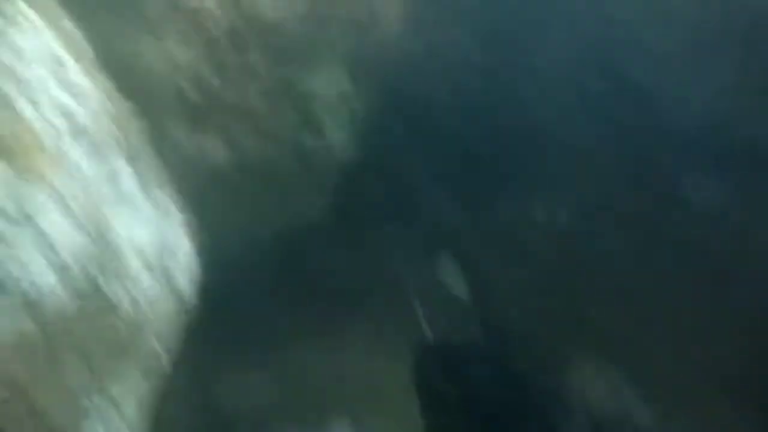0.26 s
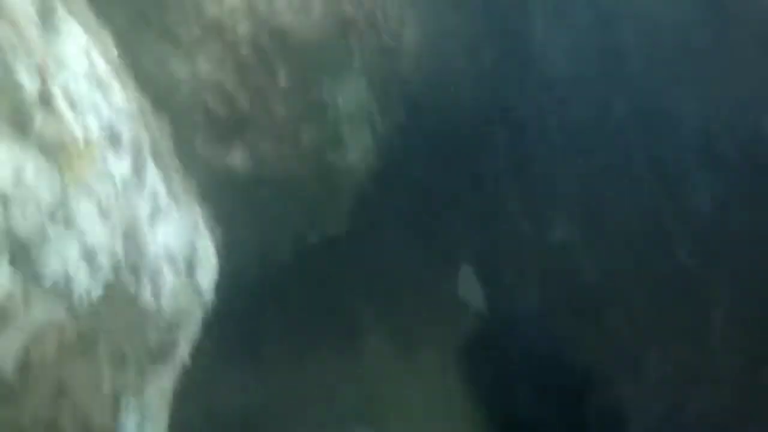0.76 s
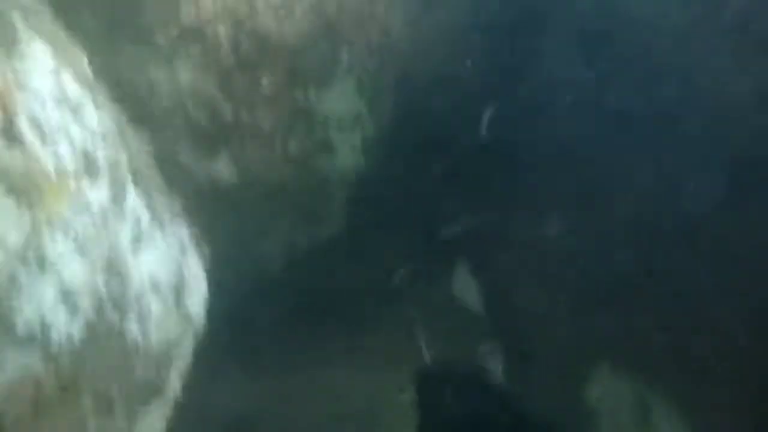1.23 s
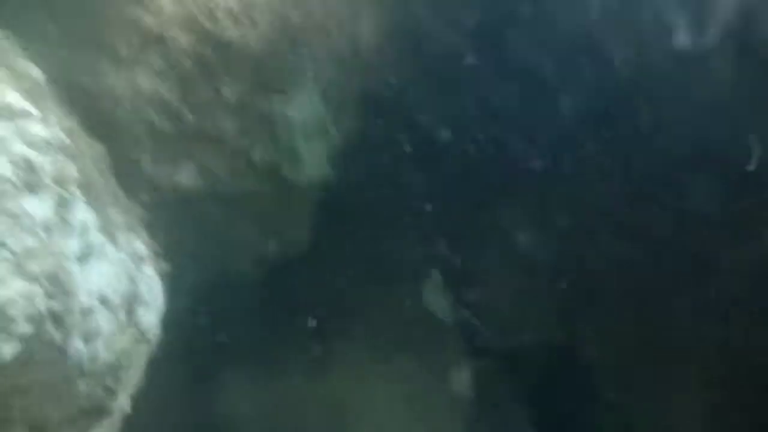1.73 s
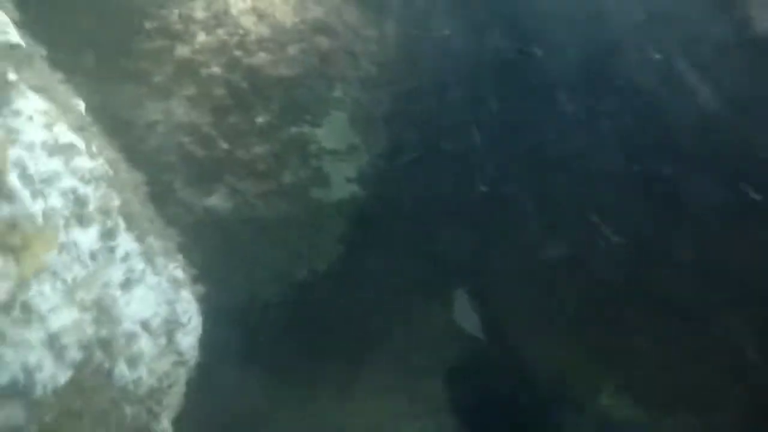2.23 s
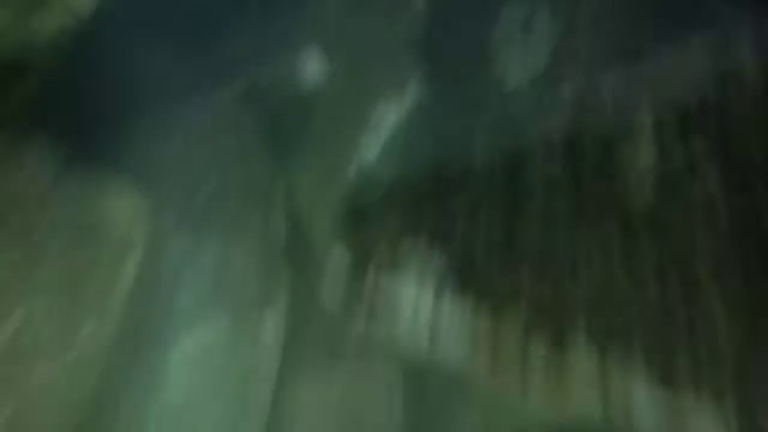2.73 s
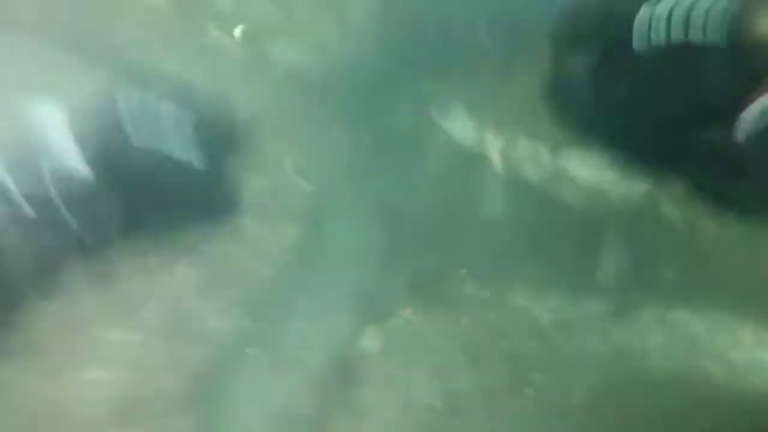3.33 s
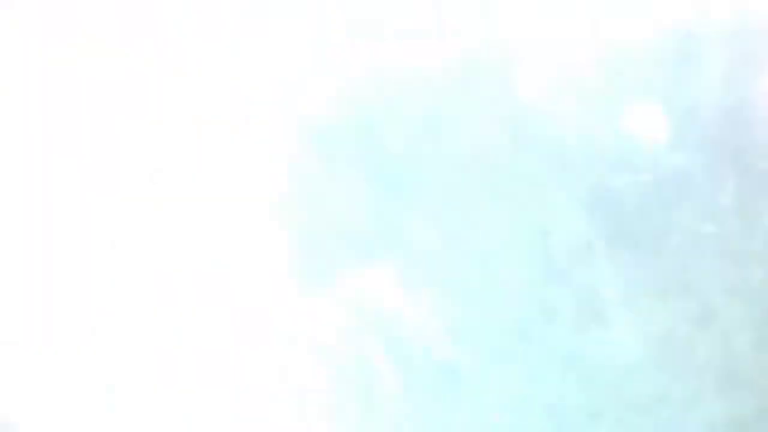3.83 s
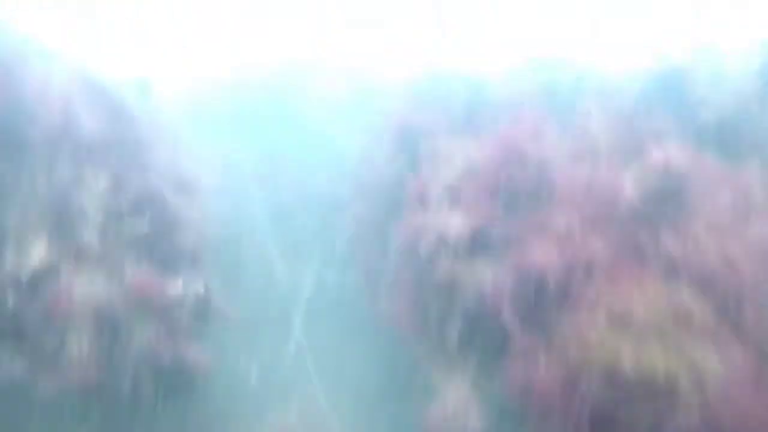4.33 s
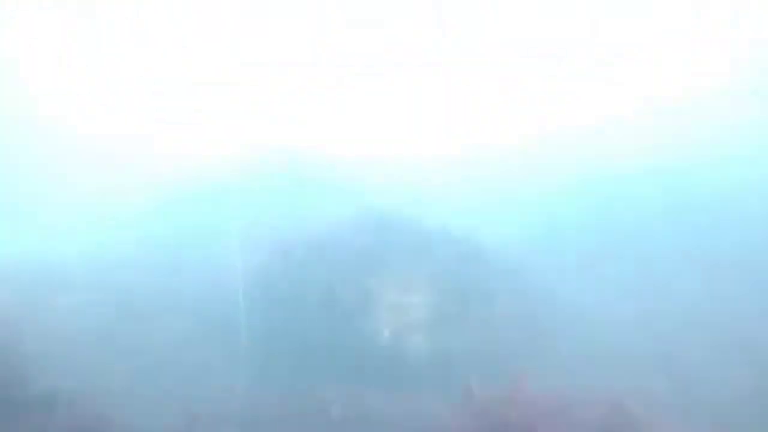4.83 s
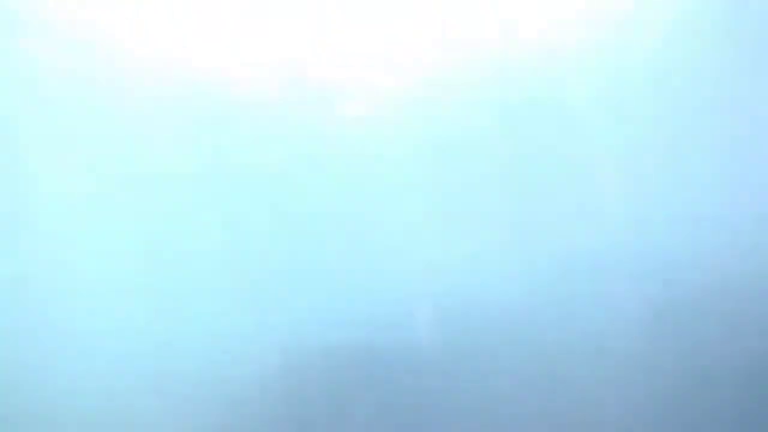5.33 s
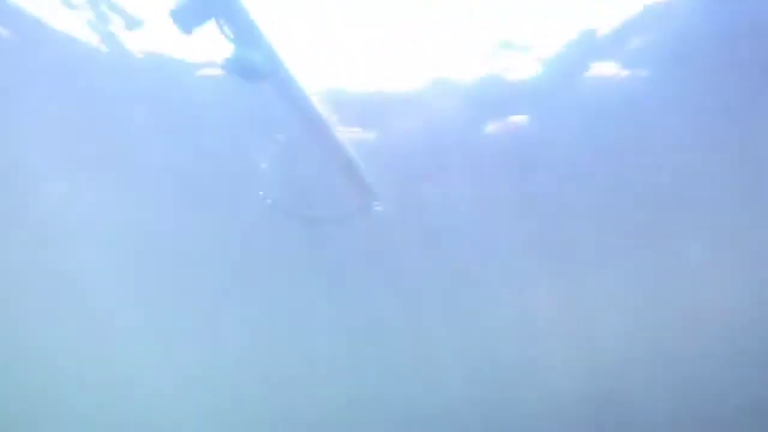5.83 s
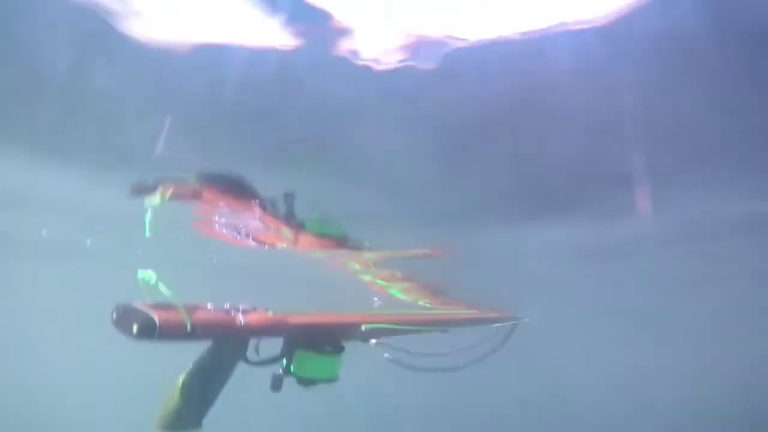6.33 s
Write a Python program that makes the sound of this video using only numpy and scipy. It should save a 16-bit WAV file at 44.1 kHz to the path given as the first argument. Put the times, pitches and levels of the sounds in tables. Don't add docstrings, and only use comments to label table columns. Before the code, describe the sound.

Heard through the wall of an underwater case, close and boxy. Blunt irregular knocks crowd the first two seconds over low surging rumble, with short dry rubbing strokes. Quieter, sparser bumps and clicks follow, with faint hiss lifting. Low bloops of trapped air, more bumps and a strong watery thump lead to a brief tumbling gurgle of bubbles at the end. Stereo collapses to mono after about two seconds.

```python
import sys
import numpy as np
from scipy import signal
from scipy.io import wavfile
from scipy.ndimage import uniform_filter1d

SR = 44100
rng = np.random.default_rng(int(sys.argv[2]) if len(sys.argv) > 2 else 0)


def transcribe(u):
    v = np.clip(np.atleast_2d(u).T, -1, 1)
    q = np.round(v * 32767).astype(np.int16)
    wavfile.write(sys.argv[1], SR, q)


def voltage_ratio(level):
    return 10 ** (np.asarray(level, float) / 20)


N = 289276

# (time [s], peak level [dB], ring frequency [Hz], upper mode level [dB])
CRAWL_KNOCKS = [(0.011, -15.5, 426, -3), (0.019, -5, 594, -3), (0.066, -25, 400, 5), (0.111, -8.5, 474, 6),
                (0.166, -24.5, 395, -2), (0.216, -21.5, 364, -7), (0.308, -7.5, 397, -3),
                (0.32, -12.5, 330, -3), (0.375, -12.5, 435, -9), (0.388, -13, 406, -10),
                (0.415, -21, 323, 14), (0.479, -22, 300, 0), (0.518, -14.5, 342, -9), (0.571, -5.5, 414, 3),
                (0.639, -14.5, 397, -5), (0.652, -10.5, 465, -12), (0.698, -7, 419, 0), (0.774, -8, 467, 8),
                (0.788, -8.5, 340, 1), (0.848, -9, 447, 3), (0.935, -9, 383, -3), (1.039, -23.5, 328, 12),
                (1.138, -25, 304, -1), (1.152, -17.5, 300, -3), (1.193, -5, 408, 10), (1.297, -6, 480, 12),
                (1.34, -18, 342, -3), (1.348, -15.5, 410, -5), (1.411, -13.5, 380, -8), (1.424, -5, 477, 7),
                (1.439, -10.5, 400, -3), (1.486, -14, 433, -5), (1.552, -20.5, 356, -15),
                (1.596, -37.5, 350, -8), (1.677, -20, 342, -5), (1.693, -35, 332, -3), (1.748, -8, 416, -6),
                (1.761, -30, 494, -3)]
TURN_KNOCKS = [(1.803, -13, 490, -6), (1.896, -35.5, 595, 3), (1.925, -8.5, 497, 7.5),
               (1.943, -21.5, 506, -7), (1.963, -17, 430, 3), (2.032, -16, 520, 8), (2.049, -9, 537, 2),
               (2.081, -25, 553, 3), (2.104, -21, 507, -3), (2.153, -25.5, 290, 10), (2.223, -22, 520, -3),
               (2.382, -33.5, 430, -2), (2.418, -29.5, 674, -8), (2.517, -18.5, 473, -1),
               (2.546, -10, 518, -2), (2.56, -10, 670, 12), (2.576, -16, 457, -4), (2.604, -5.5, 440, -15),
               (2.687, -11.5, 546, -23), (2.765, -32.5, 300, -5), (2.828, -30, 350, -2),
               (2.865, -27.5, 453, -2), (2.883, -30.5, 503, 10), (2.935, -6.5, 565, 12.5),
               (3.033, -36, 417, -4), (3.07, -11, 542, 6.5), (3.249, -33.5, 580, -2), (3.426, -31, 550, 0),
               (3.532, -9.5, 475, 1), (3.569, -32.5, 480, 7), (3.882, -29, 400, 5), (3.969, -7.5, 631, 10),
               (3.99, -8.5, 510, 7), (4.024, -12, 552, -7), (4.083, -4.5, 576, 5), (4.122, -9, 593, 4),
               (4.141, -21, 590, 2)]
RISE_KNOCKS = [(4.38, -37.5, 526, -2), (4.411, -16.5, 552, 9), (4.448, -19, 555, -2), (4.507, -24, 540, -4),
               (4.522, -9, 574, -6), (4.563, -10.5, 430, 2), (4.713, -17, 460, 0), (4.795, -12, 418, -7),
               (4.871, -21.5, 622, 4), (4.888, -16, 446, -4), (4.988, -13, 563, 3), (5.043, -6.5, 532, 2),
               (5.089, -31, 486, 0), (5.237, -10, 550, 1), (5.306, -6, 540, -1), (5.359, -12.5, 554, -13),
               (5.477, -16.5, 418, 7), (5.491, -19.5, 516, 14), (5.539, -24.5, 404, -4),
               (5.655, -8.5, 687, 1), (5.876, -18.5, 485, -5), (5.903, -20.5, 337, -7),
               (5.958, -12, 464, 1), (5.967, -3.5, 553, 9), (6.051, -24.5, 450, -6), (6.101, -11, 671, -7),
               (6.225, -13, 495, -2), (6.435, -12.5, 510, -1), (6.544, -16, 850, 6)]


def in_time(rows, t):
    s, *columns = np.transpose(rows)
    return [np.interp(t, s, column) for column in columns]


def rms_one(x):
    return x / np.sqrt(np.mean(x ** 2) + 1e-20)


def drift(rate_hz, count=N):
    hop = 40
    pole = np.exp(-2 * np.pi * rate_hz * hop / SR)
    sparse = rng.standard_normal(count // hop + 1002)
    slow = signal.lfilter([1], [1, -2 * pole, pole * pole], sparse)[500:]
    return np.interp(np.arange(count) / hop, np.arange(len(slow)), rms_one(slow))


def bandpass(x, low_hz, high_hz):
    return signal.sosfilt(signal.butter(2, [low_hz, high_hz], "band", fs=SR, output="sos"), x)


def lowpass(x, hz, order=2):
    return signal.sosfilt(signal.butter(order, hz, fs=SR, output="sos"), x)


def coloured(spectrum, patchy_db, flicker_hz):
    hz, level_db = np.transpose(spectrum)
    edges = hz[0] * 2 ** np.arange(0, np.log2(hz[-1] / hz[0]) + 0.4, 0.5)
    settle = SR // 2
    white = rng.standard_normal((2, 2, N + settle))
    together = drift(flicker_hz)
    out = 0
    for k, (low, high) in enumerate(zip(edges, edges[1:])):
        band = bandpass(white[k % 2], low, min(high, SR / 2 - 100))[:, settle:]
        own_db = np.interp(np.log(low * high) / 2, np.log(hz), level_db)
        flicker = (together + drift(flicker_hz)) / np.sqrt(2)
        out = out + band * voltage_ratio(own_db + patchy_db * flicker)
    return rms_one(out)


def add(out, s, sound):
    i = min(max(round(s * SR), 0), N)
    out[:, i:i + sound.shape[1]] += sound[:, :N - i]


def swelling(t, hz, swell_s, phase, bend=0.0, blunt=0.97):
    turns = hz * (t + bend * 0.0043 * (1 - np.exp(-t / 0.0034)))
    envelope = (t / swell_s * np.exp(1 - t / swell_s)) ** blunt
    return envelope * np.sin(2 * np.pi * turns + phase)


def damped(t, hz, t60, rise_s, phase):
    return (1 - np.exp(-t / rise_s)) * voltage_ratio(-60 * t / t60) * np.sin(2 * np.pi * hz * t + phase)


def hiss(t):
    # (frequency [Hz], density [dB per Hz])
    hiss_colour = [(1530, -37), (2600, -23), (3490, -12), (4540, 0), (6880, -6.5), (8940, 7.5),
                   (10400, -4.5), (12000, -18.5), (15600, -40), (22000, -120)]
    # (time [s], hiss level [dB])
    gain = [
        (0, -68.5),
        (1.6, -69),
        (2.3, -63.5),
        (3.3, -64.5),
        (4.42, -60.5),
        (5.95, -61.5),
        (5.99, -66.5),
        (6.56, -69),
    ]
    noise = voltage_ratio(in_time(gain, t)[0]) * coloured(hiss_colour, patchy_db=2.5, flicker_hz=25.0)
    return lowpass(noise, 13500.0) * voltage_ratio([[0], [-4]])


def sloshing():
    slosh_db, rise_s, dies_s = 8, 0.0024, 0.022
    s, peak_db, *_ = np.transpose(CRAWL_KNOCKS + TURN_KNOCKS + RISE_KNOCKS)
    stir = np.zeros(N)
    stir[(s * SR).astype(int)] = voltage_ratio(slosh_db + peak_db)
    fast, slow = np.exp(-1 / (rise_s * SR)), np.exp(-1 / (dies_s * SR))
    return 1 + signal.lfilter([1 - fast], np.convolve([1, -fast], [1, -slow]), stir)


def water(t):
    # (time [s], level [dB])
    surge = [(0.0, -13), (1.0, -18), (1.46, -13), (1.62, -27), (1.72, -12.5), (2.25, -15.5), (2.34, -20.5),
             (2.6, -8), (2.67, -19.5), (3.3, -19), (3.54, -9.5), (3.73, -26.5), (3.91, -20), (3.99, -11),
             (4.15, -10), (4.24, -23.5), (4.4, -10.5), (6.56, -18.5)]
    # (time [s], depth [m])
    depth = [
        (0, 2.5),
        (3.3, 2.5),
        (3.7, 1),
        (4.25, 2),
        (5.0, 1.16),
        (6.0, 0.8),
        (6.56, -1.64),
    ]
    # (frequency [Hz], density [dB per Hz])
    rumble_colour = [(12, -4), (25, 1), (50, 0), (80, -6.5), (130, -17), (220, -22), (340, -58.5),
                     (500, -82)]
    wash_colour = [(88, -30), (150, -8), (288, -11), (412, -15.5), (469, -4), (743, -22.5), (998, -33.5),
                   (1850, -25), (3200, -53.5), (4160, -81.5), (7040, -120)]
    surface_db, db_per_m = -29, -6
    follows, lag_s = 0.28, 0.12
    surge_db, depth_m = in_time(surge, t)[0], in_time(depth, t)[0]
    slow_db = uniform_filter1d(surge_db - surge_db.mean(), round(lag_s * SR))
    wash_db = surface_db + db_per_m * depth_m + follows * slow_db
    stirred = sloshing()
    rumble = voltage_ratio(surge_db - 5.0) * stirred * coloured(rumble_colour, patchy_db=2.4, flicker_hz=9.0)
    wash = voltage_ratio(wash_db - 6.5) * stirred ** 0.23 * coloured(wash_colour, patchy_db=4.5, flicker_hz=25.0)
    return rumble * voltage_ratio([[0], [-19]]) + wash * voltage_ratio([[0], [-3]])


def gurgle():
    surface_s, lasts_s = 6.09, 0.47
    steady_db, burst_db, burst_s = -18, -4, 0.037
    start_hz, sag_hz_per_s = 255, 273
    small_db_per_octave = -13
    out, t = np.zeros((2, N)), np.arange(round(0.1 * SR)) / SR
    for when, size, loud in rng.random((200, 3)):
        since = when * lasts_s
        octaves = 2.4 * size ** 1.2 - 0.25
        hz = (start_hz - sag_hz_per_s * since) * 2 ** octaves
        level_db = steady_db + burst_db * (1 - size) * np.exp(-since / burst_s)
        level_db += 3.5 + small_db_per_octave * octaves + 13.0 * loud ** 3
        ring = damped(t, hz * (1 + 0.0208 * hz * t), 31.0 / hz, 1.1 / hz, np.zeros((2, 1)))
        add(out, surface_s + since, voltage_ratio(level_db) * ring)
    return out


def glugs(t):
    # (start [s], length [s], first frequency [Hz], last frequency [Hz], level [dB])
    pockets = [(0.696, 0.023, 456, 430, -8.5), (3.243, 0.26, 267.2, 289, -30),
               (3.425, 0.12, 292, 277, -28.5), (3.57, .11, 285, 271, -35.5), (3.528, 0.025, 200, 171, -9.5),
               (3.337, 0.022, 115.6, 85.4, -3.5), (4.685, 0.061, 179.4, 175, -4.5),
               (4.766, 0.069, 226, 289, -16.5), (4.795, 0.055, 296, 265.3, -12.5),
               (4.831, 0.043, 275.5, 138, -14.5), (4.893, 0.037, 215, 153, -4.5)]
    blobs = [(6.103, 0.044, 348.4, 235, -5), (6.135, .03, 225, 255, -6.5), (6.152, .055, 277, 430, -17.5),
             (6.188, 0.033, 196, 195, -12), (6.157, 0.055, 106.3, 89.6, -15.5), (6.251, 0.11, 115, 95, -14),
             (6.215, 0.1, 238, 185, -15.5), (6.27, 0.036, 353, 400, -14.5), (6.274, 0.015, 740, 780, -30),
             (6.275, 0.067, 217, 170, -10), (6.287, .032, 564, 520, -19), (6.325, .056, 168, 185, -7.5),
             (6.342, 0.032, 628, 680, -25), (6.383, 0.019, 337, 360, -11.5), (6.39, 0.028, 617, 720, -22),
             (6.413, .022, 385, 400, -18), (6.432, 0.045, 566, 520, -19.5), (6.44, .03, 169, 150, -11.5),
             (6.464, 0.032, 608, 700, -30), (6.478, 0.079, 141.7, 120, -10.5),
             (6.485, 0.026, 381, 340, -21), (6.534, 0.019, 630, 700, -19)]
    attack, release = 0.21, 0.3
    out = np.zeros((2, N))
    wobble = voltage_ratio(2.67 * drift(58))
    waver = 1 + 0.043 * drift(25.45)
    for s, length, first_hz, last_hz, level_db in pockets + blobs:
        span = slice(round(s * SR), round((s + length) * SR))
        done = (t[span] - s) / length
        on = np.clip(np.minimum(done / attack, (1 - done) / release), 0, 1)
        hz = (first_hz + (last_hz - first_hz) * done) * waver[span]
        phase = 2 * np.pi * np.cumsum(hz) / SR
        partials = np.sin(phase) + voltage_ratio(-41.5) * np.sin(3 * phase)
        out[0, span] += on * voltage_ratio(level_db) * wobble[span] * partials
    return out


def shell(drive, modes, patchy_db):
    alike_above_hz, alike_side_db = 7000, -8.5
    out = 0
    for k, (hz, width_hz, level_db, phase) in enumerate(modes):
        pole = np.exp((2j * hz - width_hz) * np.pi / SR)
        uneven = drive * voltage_ratio(level_db + patchy_db * drift(50.5, count=len(drive)))
        ring = signal.lfilter([1 - abs(pole)], [1, -pole], uneven) * (-1) ** k
        side = (ring * np.exp(1j * phase)).imag * voltage_ratio(alike_side_db * (hz > alike_above_hz))
        out = out + np.array([ring.imag, side])
    return out


def strap_grains():
    slips = rng.random(N) < 2300 * voltage_ratio(4.5 * drift(35)) / SR
    strength = voltage_ratio(5.4 * np.minimum(rng.exponential(1, N), 3.5))
    return rms_one(slips * strength * rng.choice([-1, 1], N) * voltage_ratio(1.5 * drift(110)))


def fizz(grains):
    # (middle [s], half length [s], frequency [Hz], level [dB])
    crackles = [(3.503, 0.01, 5600, -48), (4.562, .012, 4600, -37.5), (3.536, 0.0064, 1080, -19),
                (.022, 0.0054, 800, -22), (5.5, .035, 4420, -43), (5.66, .02, 3930, -35),
                (5.508, .012, 1230, -36), (4.82, .015, 1750, -42), (2.955, .008, 1130, -38),
                (3.62, .03, 4150, -52), (6.078, .01, 3750, -46), (6.547, .01, 3750, -42),
                (6.54, .015, 2900, -44), (5.72, 0.012, 4100, -44), (5.741, .006, 4300, -44),
                (5.766, .006, 4350, -42)]
    out = np.zeros((2, N))
    for s, half_s, hz, level_db in crackles:
        near = np.arange(round(-half_s * SR), round((half_s + 0.02) * SR))
        fade = np.clip(1 - abs(near) / SR / half_s, 0, 1)
        specks = fade * grains[(round(s * SR) + near) % N]
        add(out, s - half_s, shell(specks, [(hz, 320, level_db + 20.5, 0)], patchy_db=0.5))
    return out


def strap(t, grains):
    # (start [s], length [s], level [dB], treble re level [dB])
    rubs = [(0.01, 0.1, -34.5, -4), (0.337, 0.13, -30.5, -6.5), (0.426, 0.071, -24.5, -9),
            (0.589, 0.092, -23.5, -6.5), (0.886, 0.094, -29.5, -4.5), (1.093, 0.042, -26, 1),
            (1.105, 0.086, -21, -6.5), (1.457, 0.089, -24, -8.5), (1.628, 0.14, -35.5, -8.5),
            (1.742, 0.082, -42.5, -15), (1.865, 0.091, -33, -5.5), (3.545, 0.027, -45, -9),
            (3.598, 0.046, -48.5, -13), (3.643, 0.065, -44.5, -9), (3.694, 0.067, -46.5, -6),
            (3.787, 0.26, -50.5, -4), (4.393, 0.82, -56, -1), (5.607, 0.1, -37, -4),
            (5.912, 0.048, -41, -20), (6.0, 0.18, -46.5, -23), (6.154, .25, -45.5, -21),
            (6.298, 0.37, -45, -23.5), (6.493, 0.15, -31.5, -38)]
    # (start [s], length [s],
    # level [dB], treble re level [dB])
    releases = [
        (0, 0.02, -21, -8),
        (0.083, 0.017, -38, -30),
        (1.03, 0.051, -21, -15.5),
        (1.326, 0.15, -37.5, -6.5),
        (2.137, 0.18, -46, 0.5),
        (3.409, 0.042, -39.5, -21),
        (4.318, 0.14, -39, 5.5),
        (4.557, 0.039, -31.5, -17.5),
        (5.48, 0.081, -44.5, -25.5),
        (5.71, 0.35, -60.5, -4.5),
    ]
    drive = np.zeros((2, N))
    strokes = [(row, 0.46) for row in rubs] + [(row, 0.048) for row in releases]
    for (start, length, level_db, treble_db), rise in strokes:
        end = start + length
        span = slice(max(round(start * SR), 0), round(end * SR))
        pressure = np.interp(t[span], [start, start + rise * length, end], [0, 1, 0]) ** 2.7
        drive[:, span] += voltage_ratio([[level_db + 17.5], [level_db + treble_db + 13.0]]) * pressure * grains[span]
    return drive


def ticks(t):
    # (time [s], peak level [dB], ring frequency [Hz], treble re peak [dB])
    taps = [(0.1665, -37, 1590, -26), (0.4422, -30, 2060, 2), (0.9675, -37, 1690, -1.5),
            (1.0341, -19, 2060, -7.5), (1.1062, -37.5, 1870, 10.5), (1.278, -30, 2090, -20),
            (1.8074, -22, 1920, -17), (2.0526, -38.5, 1640, -16), (2.487, -25.5, 2240, -25),
            (2.5473, -23.5, 1660, -16), (2.56, -23.5, 1900, -7.5), (2.604, -23.5, 1780, -17),
            (2.624, -40.5, 1700, 4), (2.639, -42, 2160, -18), (2.8274, -58, 1970, -10),
            (2.9112, -49.5, 1700, 9), (3.3365, -52, 1500, 1), (3.399, -24.5, 2180, -18),
            (3.4065, -27.5, 4300, -17), (3.532, -13, 1870, -12), (3.563, -38, 1700, -16),
            (3.5993, -35, 1800, -22), (3.7518, -44, 1900, -12), (3.7954, -46, 1410, -16),
            (4.5051, -44, 1890, -20), (4.7939, -41.5, 1920, -29), (4.8882, -35, 1940, -17),
            (5.3384, -37, 1890, -23), (5.389, -50, 1910, -19), (5.404, -44, 1930, -18),
            (5.4974, -31.5, 1880, -21), (5.628, -34, 1830, -14), (5.7368, -38, 1800, -11),
            (5.7656, -44, 1820, -12), (5.821, -41, 1780, -18), (5.938, -36.5, 2550, -20),
            (6.1127, -31, 1500, -26), (6.1489, -46, 1740, -27), (6.4616, -35, 1830, -28),
            (4.024, -27.5, 1950, -19), (4.4485, -35, 1880, -23), (4.6391, -35, 1900, -13),
            (4.9856, -16.5, 2060, -20), (5.089, -52, 1560, 7), (5.26, -40, 1930, -9.5),
            (5.5605, -23, 3580, -6), (5.6561, -13.5, 1740, -41), (5.715, -35, 1760, -21),
            (5.926, -32, 1590, -27), (6.2085, -33, 1790, -35), (6.38, -30, 2060, -51)]
    own, drive, short = np.zeros((2, N)), np.zeros((2, N)), t[:round(0.03 * SR)]
    for (s, peak_db, hz, treble_db), luck in zip(taps, rng.random(len(taps))):
        phase = np.array([[0], [2 * np.pi * luck]])
        add(own, s, voltage_ratio(peak_db - 0.9) * swelling(short, hz, 0.001, phase))
        crack = rng.standard_normal(len(short)) * voltage_ratio(-60 * short / 0.015)
        add(drive, s, voltage_ratio([[peak_db + 16.5], [peak_db + treble_db + 22.0]]) * crack)
    return own, drive


def contacts(t):
    # (frequency [Hz], width [Hz], level [dB], side phase [rad])
    low_modes = [(430, 370, -3.5, 2), (790, 180, -9, 1.5), (1570, 600, -11.5, 10.5), (1807, 157, 4, 4.5),
                 (2060, 121, 4.5, 4), (2760, 320, -9.5, 1), (3283, 180, -10.5, 4), (3810, 190, -8.5, -2)]
    high_modes = [(4850, 710, -0.5, -1.5), (5810, 270, 2.5, -4), (6210, 93, 2, -5), (7540, 1000, -0.5, 10),
                  (7410, 1200, -5.5, -4.5), (8480, 520, -6.5, -2.5), (9600, 370, -23.5, -2.5),
                  (13300, 640, -27, 6.5)]
    gap_hz, top_hz = 4880, 8400
    grains = strap_grains()
    own, drive = ticks(t)
    own = own + fizz(grains)
    low, high = drive + strap(t, grains) + 1e-18
    rings = shell(low, low_modes, patchy_db=3.0)
    rings = rings + shell(high, high_modes, patchy_db=3.5) * voltage_ratio([[0], [-1.5]])
    rings = signal.lfilter(*signal.iirnotch(gap_hz, 4.0, SR), rings)
    return lowpass(own, top_hz) + lowpass(rings, top_hz, order=6) + voltage_ratio(-15.5) * rings


def thuds():
    # (time [s], peak level [dB], frequency [Hz])
    slaps = [(0.391, -20, 60), (1.144, -9, 119), (1.351, -11, 66), (1.926, -10, 102), (2.027, -6.5, 60),
             (2.097, -10, 62.6), (2.217, -14, 101), (2.558, -6, 190), (2.605, -19, 61.4),
             (2.863, -9.5, 61.9), (3.526, -13, 94), (3.62, -8.5, 72.6), (4.025, -22, 63), (4.405, -6.5, 61),
             (4.984, 2.5, 107), (5.509, -5.5, 62.6), (6.05, -16.5, 121)]
    out, t = np.zeros((2, N)), np.arange(round(0.12 * SR)) / SR
    for s, peak_db, hz in slaps:
        slap = swelling(t, hz, 0.54 / hz, np.pi)
        add(out, s - 0.003, voltage_ratio(peak_db - 2.5) * slap * voltage_ratio([[0], [-19]]))
    return out


def knocks():
    swell_ms_per_db = 0.08
    push_db, push_follows, push_scatter_db = -1, 0.45, 7
    rattle_db, rattle_s = -19.5, 0.0047
    out, t = np.zeros((2, N)), np.arange(round(0.07 * SR)) / SR
    play = rms_one(bandpass(rng.standard_normal((2, N + len(t))), 300, 850))
    stages = [(CRAWL_KNOCKS, 2.8, -14), (TURN_KNOCKS, 3.32, -17), (RISE_KNOCKS, 3.7, -15.5)]
    blows = [(*row, *touch) for rows, *touch in stages for row in rows]
    for (s, peak_db, hz, bright_db, swell_ms, air_db), luck in zip(blows, rng.random((len(blows), 7))):
        swell_s = max(swell_ms + swell_ms_per_db * peak_db, 0.8) / 1000
        turn = np.array([[0], [2 * np.pi * luck[0]]])
        below_hz, above_hz = hz * (0.671 + 0.21 * luck[1]), hz * (1.283 + 0.36 * luck[2])
        wall = swelling(t, hz, swell_s, turn, bend=0.15, blunt=1.65)
        wall += voltage_ratio(-7.5) * swelling(t, below_hz, swell_s * 1.94, 1.12 * turn, blunt=2.13)
        wall += voltage_ratio(-18.0) * swelling(t, above_hz, swell_s * 1.72, 1.4 * turn, blunt=1.63)
        upper = swelling(t, 1000 + 250 * luck[3], swell_s * 0.3, 0.91 * turn, blunt=1.0)
        top = swelling(t, 1700 + 300 * luck[5], swell_s * 0.59, 1.5 * turn, blunt=2.1)
        wall += voltage_ratio(bright_db - 22.5) * upper + voltage_ratio(bright_db - 29.0) * top
        wall += voltage_ratio(air_db) * swelling(t, hz * 1.017, swell_s * 2.57, turn)
        rattle = play[:, round(s * SR):][:, :len(t)]
        wall += voltage_ratio(rattle_db) * t / rattle_s * np.exp(1 - t / rattle_s) * rattle
        water_db = push_db + (push_follows - 1) * peak_db - push_scatter_db * luck[6]
        push = voltage_ratio(water_db) * swelling(t, 70 + 70 * luck[4], 0.0024, np.pi + turn)
        blow = wall * voltage_ratio([[0], [-1.5]]) + push * voltage_ratio([[0], [-9]])
        add(out, s - 0.4 * swell_s, voltage_ratio(peak_db - 0.18) * blow)
    return out


def scene():
    # (time [s], side level [dB])
    width = [
        (0, 1),
        (1.8, -1),
        (2.2, -8),
        (2.3, -17),
        (2.6, -22.5),
        (3.2, -52.5),
    ]
    t = np.arange(N) / SR
    mid, side = hiss(t) + water(t) + gurgle() + glugs(t) + contacts(t) + thuds() + knocks()
    side = side * voltage_ratio(in_time(width, t)[0])
    return np.array([mid + side, mid - side])


def band_limit(x):
    return signal.sosfilt(signal.butter(12, 16450, fs=SR, output="sos"), x)


def record(dry):
    leaked = signal.sosfilt(signal.butter(1, 8, "high", fs=SR, output="sos"), dry)
    limited = leaked / (1 + np.abs(leaked / 0.98) ** 6) ** (1 / 6)
    return band_limit(limited)


dry = scene()
out = record(dry)
transcribe(out)
```